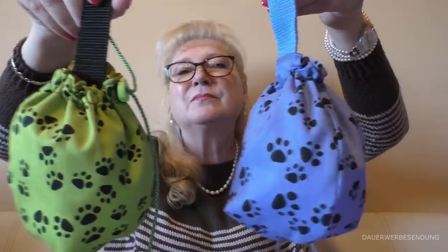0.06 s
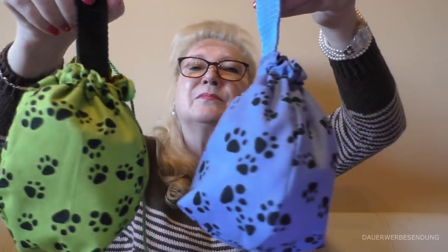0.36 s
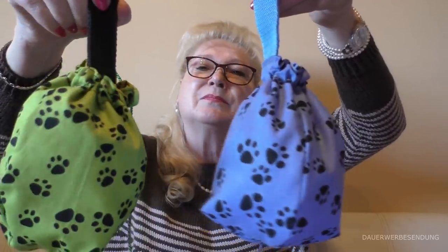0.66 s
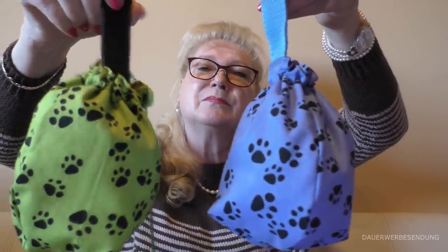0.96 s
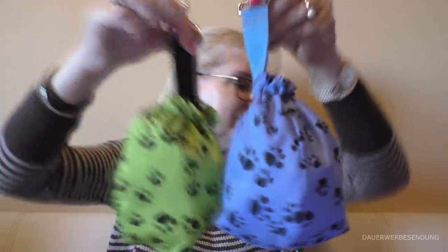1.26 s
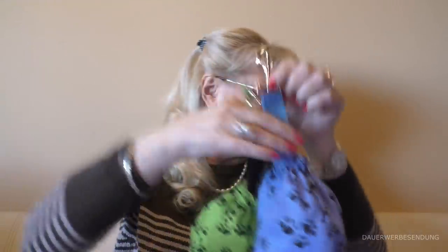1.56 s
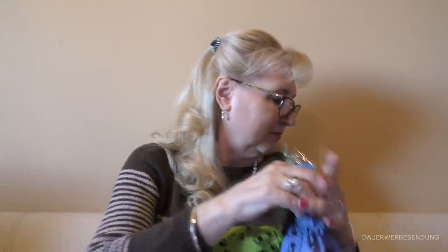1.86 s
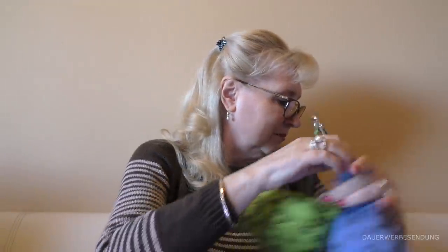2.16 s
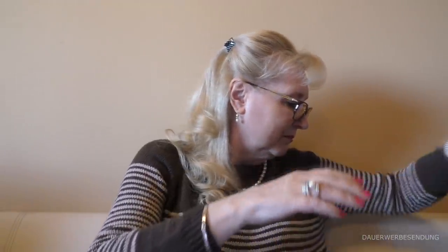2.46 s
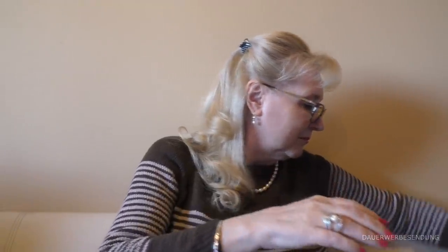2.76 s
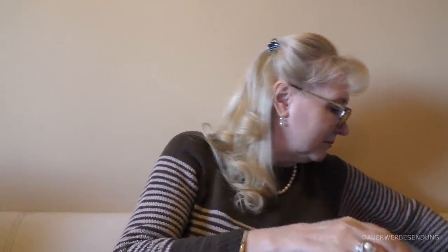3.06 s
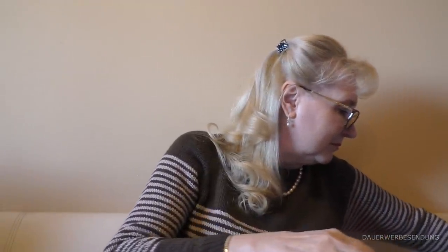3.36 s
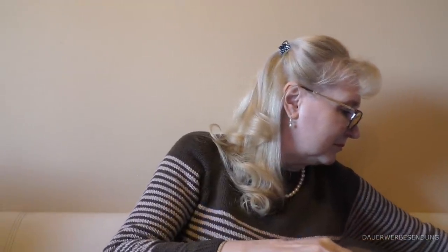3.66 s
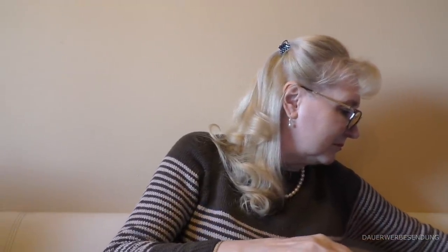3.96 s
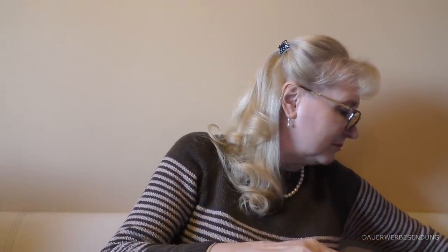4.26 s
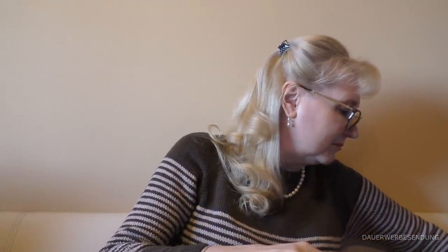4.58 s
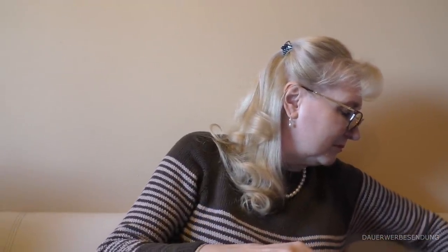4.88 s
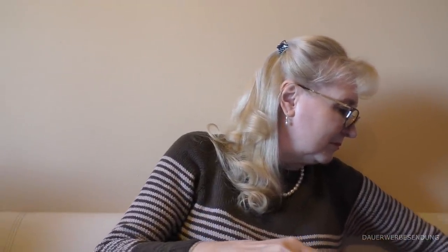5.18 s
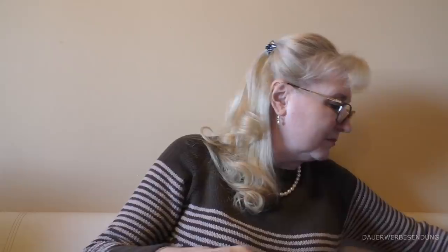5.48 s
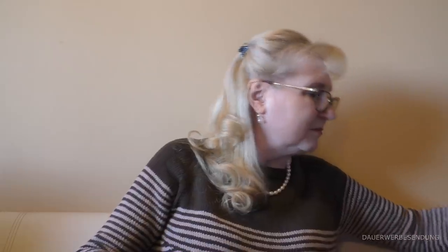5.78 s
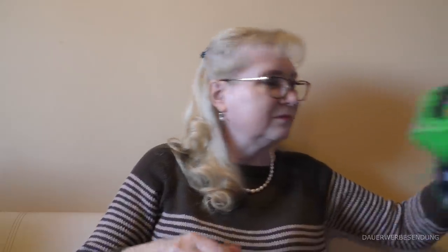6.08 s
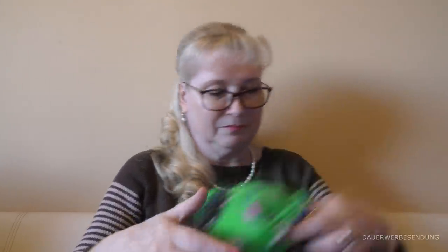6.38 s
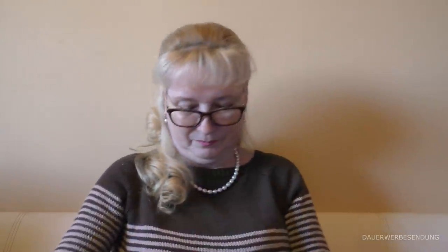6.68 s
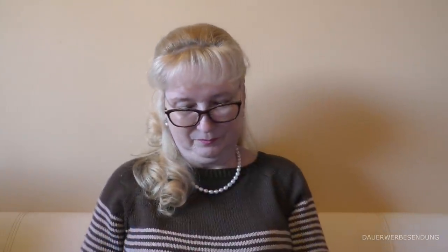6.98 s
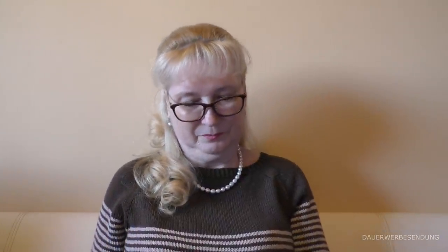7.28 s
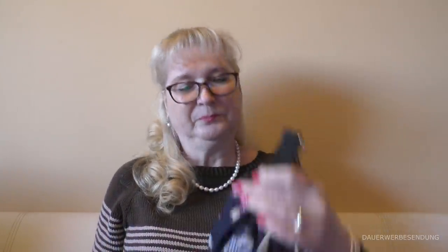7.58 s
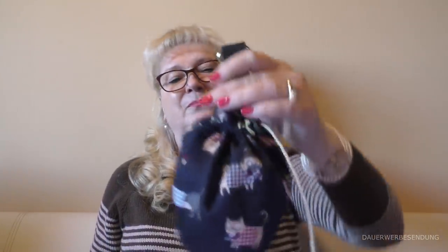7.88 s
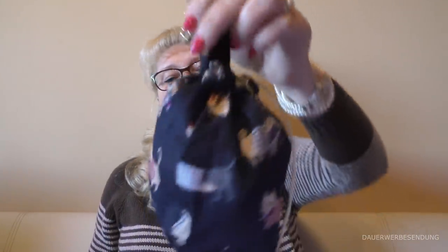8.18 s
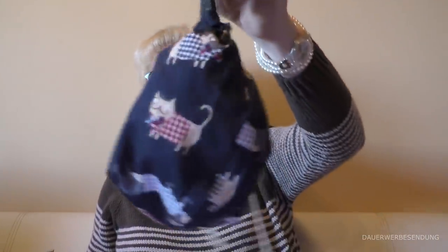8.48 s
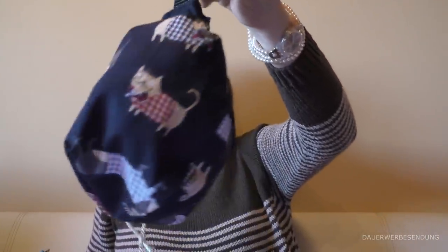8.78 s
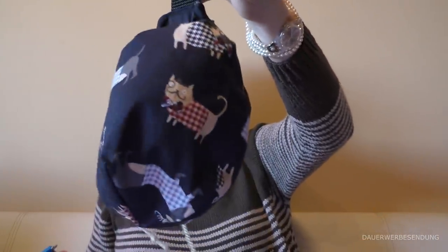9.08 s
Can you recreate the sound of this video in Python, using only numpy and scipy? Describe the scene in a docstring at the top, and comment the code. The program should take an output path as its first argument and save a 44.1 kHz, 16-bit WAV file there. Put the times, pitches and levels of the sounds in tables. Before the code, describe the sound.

Cloth bags and sleeves rustle, metal clips jingle, and filled bags land on a table with soft crunches and knocks.

```python
"""Small filled cloth bags on webbing loops are lowered onto a table and picked up in a quiet living room.
First cloth and sleeves rub and swish, and near 1.7 s a big metal ring is struck among jingling clips.
Around 3.2 s a bag lands: its filling crunches, its weight thuds and hard bits knock. Just after 5 s
a heavier landing sets the table top humming. Then come more rubbing, light bumps, clinks of clips
and jewellery, and a few last faint knocks. Everything is close to one microphone."""
import sys
import numpy as np
from scipy import signal
from scipy.fft import rfft, irfft
from scipy.io import wavfile
from scipy.ndimage import uniform_filter1d

SR = 44100
rng = np.random.default_rng(int(sys.argv[2]) if len(sys.argv) > 2 else 0)


def generate_wav(sig):
    """Save sig (samples, or channels by samples) to the path in sys.argv[1] as 16-bit PCM at SR."""
    pcm = np.round(np.clip(np.atleast_2d(sig).T, -1, 1) * 32767).astype(np.int16)
    wavfile.write(sys.argv[1], SR, pcm)


N = 411894
T = np.arange(N) / SR
AGE = T[:SR * 3 // 4]  # seconds since a short sound began

# tone of a quickly moving fold of cloth: f/Hz, level/dB
FOLD_TONE = [(80, -0.5), (300, -0.5), (650, -9), (1200, -1), (3000, -2), (6500, -9), (11000, -10),
             (17000, -26)]


def undb(db):
    """Turn decibels into a factor to multiply by."""
    return 10 ** (np.asarray(db) / 20)


def unit(x):
    """Scale a signal to an average strength (rms) of 1."""
    return x / np.std(x)


def crest(x, size=176):
    """Scale a signal so that its loudest few milliseconds have a strength of 1."""
    return x / np.sqrt(uniform_filter1d(x * x, size).max())


def add(out, start, x):
    """Mix x into out from a start time in seconds."""
    i = max(int(start * SR), 0)
    out[i:i + len(x)] += x[:N - i]


def colour(x, tone, tilt_db=0):
    """Give x the tone of a table (f/Hz, level/dB); a positive tilt, in dB per octave, brightens it."""
    octave = np.log2(np.maximum(np.fft.rfftfreq(len(x), 1 / SR), 1))
    hz, db = np.transpose(tone)
    tilt = tilt_db * (np.clip(octave, np.log2(hz[0]), np.log2(hz[-1])) - 10)
    gain = undb(np.interp(octave, np.log2(hz), db) + tilt)
    return unit(irfft(rfft(x) * gain, len(x)))


def grains(count, rate, spread_db):
    """Tiny slips of uneven size at random moments, about `rate` of them a second."""
    size = undb(spread_db * np.minimum(rng.exponential(size=count), 5))
    return unit(rng.standard_normal(count) * size * (rng.random(count) < rate / SR))


def wobble(rate):
    """A line that wanders to a new random value `rate` times a second."""
    points = rng.standard_normal(int(N / SR * rate) + 2)
    return unit(np.interp(T * rate, np.arange(len(points)), points))


def fade(t60, hold=0):
    """Stay at full strength for `hold` seconds, then die away by 60 dB every t60 seconds."""
    return np.exp(-np.log(1000) * np.maximum(AGE - hold, 0) / max(t60, 1 / SR))


def still_room():
    """The faint, steady rush of a quiet room."""
    # tone of the background: f/Hz, level/dB
    room_tone = [(15, -43), (25, -10.5), (74, -6), (151, -4.5), (204, -6.5), (254, -5), (393, -11),
                 (609, -26.5), (717, -19.5), (942, -16.5), (1810, -15), (3050, -19), (6540, -35.5),
                 (12300, -25.5), (17000, -29)]
    return undb(-61.5) * colour(rng.standard_normal(N), room_tone)


def room_echo(x):
    """A furnished room adds one near reflection and a short tail whose treble dies first."""
    noise = rng.standard_normal(len(AGE))
    low = signal.sosfilt(signal.butter(2, 3500, fs=SR, output="sos"), noise)
    tail = (low * fade(0.4) + undb(-1.5) * (noise - low) * fade(0.25)) * (AGE > .004)
    response = undb(-10.0) * tail / np.sqrt(np.sum(tail ** 2))
    response[0] = 1  # the direct sound
    response[int(.0095 * SR)] += .15  # the near reflection
    return signal.fftconvolve(x, response)[:N]


def rubbing():
    """Cloth slides in uneven pulls: many small slips, a finer hiss of fibres and creases that snap."""
    # tone of sliding cloth: f/Hz, level/dB
    cloth_tone = [(60, -23.5), (130, -3.5), (380, -3.5), (650, -14.5), (850, -13), (1250, -3.5),
                  (2000, -8.5), (3200, -13), (5000, -21.5), (9000, -40.5)]
    # tone of its fibres: f/Hz, level/dB
    fibre_tone = [(1500, -32.5), (3500, -3.5), (5500, -3), (7500, -6.5), (10000, -4), (13000, -10),
                  (17000, -16)]
    # pulls of cloth over cloth: t/s, length/s, level/dB, hiss compared with that level/dB
    pulls = [(0.975, 0.32, -74, 0.5), (1.394, 0.13, -60.5, -4.5), (1.667, 0.17, -61.5, -2.5),
             (1.922, 0.18, -60.5, -6.5), (2.147, 0.16, -60.5, 2.5), (2.44, 0.11, -68.5, -6),
             (2.72, 0.24, -56.5, -7.5), (2.977, 0.47, -61, -5.5), (3.565, 0.36, -56.5, -9),
             (4.111, 0.25, -62.5, -5.5), (4.333, 0.4, -58.5, -3), (4.776, 0.26, -57.5, -7),
             (5.305, 0.31, -56.5, -4.5), (5.652, 0.093, -60.5, -6.5), (5.81, 0.54, -68, -10.5),
             (6.345, 0.15, -61, -15), (6.513, 0.24, -56, -5.5), (6.796, .33, -60, -4.5),
             (7.16, 0.42, -60.5, -5), (7.6, 0.34, -69, -6.5), (7.902, 0.18, -63, -5),
             (8.147, 0.9, -74, -5.5)]
    rise_s, release_s, wobble_db = 0.016, 0.073, 2.18
    body, hiss = np.zeros(N), np.zeros(N)
    for start, length, db, hiss_db in pulls:
        rise = np.clip((T - start) / rise_s, 0, 1)
        release = np.exp(-np.maximum(T - start - length, 0) / release_s)
        effort = undb(db) * rise * release
        body = np.maximum(body, effort)
        hiss = np.maximum(hiss, effort * undb(hiss_db))
    slips = undb(2.5) * colour(grains(N, rate=6000, spread_db=2.0), cloth_tone)
    creases = undb(-11.5) * colour(grains(N, rate=70, spread_db=1.5), FOLD_TONE)
    fibres = undb(2.5) * colour(grains(N, rate=9000, spread_db=-1), fibre_tone)
    return (body * (slips + creases) + hiss * fibres) * undb(wobble_db * wobble(rate=35))


def swishes():
    """One fold pulled quickly over another swells up and dies away a little more slowly."""
    # flicks of cloth: t/s of the peak, level/dB, fall/s, tilt/(dB per octave)
    flicks = [(1.197, -40, 0.012, 1.5), (1.368, -48.5, 0.011, 0.5), (2.933, -52, 0.015, 0),
              (3.132, -48.5, 0.057, -0.5), (4.39, -53, .02, -1.5), (5.46, -51.5, .025, 4),
              (6.543, -48, 0.017, 15)]
    out, from_peak = np.zeros(N), AGE - AGE.mean()
    for peak, db, fall, tilt_db in flicks:
        swell = np.exp(-np.abs(from_peak / np.where(from_peak < 0, 0.81 * fall, fall)))
        rustle = colour(grains(len(AGE), rate=5900, spread_db=1.0), FOLD_TONE, tilt_db)
        add(out, peak - AGE.mean(), undb(db) * swell * rustle)
    return out


def ringing(taps, notes, tilt_db, detune):
    """Taps make metal ring at its own notes, whose pitch and level vary a little from clink to clink."""
    out, scatter_db = 0, 0.5
    for (hz, db, t60), (off_pitch, off_level) in zip(notes, rng.standard_normal((len(notes), 2))):
        # this filter answers every tap with one fading note
        pole = np.exp((2j * np.pi * hz * (1 + detune * off_pitch) - np.log(1000) / t60) / SR)
        note = crest(signal.lfilter([1], [1, -pole], taps).imag)
        gain = undb(db + tilt_db * np.log2(hz / notes[0][0]) + scatter_db * off_level)
        out = out + gain * note
    return crest(out)


def clink(rattle_s, tilt_db, links_db, ring_db=-9.5, size=8192):
    """Metal parts strike, rattle and scrape; every tap sounds the small links and the big ring."""
    # notes of the small clips and links: f/Hz, level/dB, t60/s
    link_notes = [(4730, -7, 0.066), (5260, -4, 0.044), (6470, -7, 0.061), (8900, -22, .03),
                  (8850, -5, .03), (9720, 7, 0.06), (9730, 3.5, 0.033), (9700, 0, .05),
                  (10700, -8.5, 0.056), (11180, 5, 0.059), (13300, -27.5, .03), (17050, -27.5, .04)]
    # notes of the big metal ring: f/Hz, level/dB, t60/s
    ring_notes = [(6500, 10.5, 0.061), (7670, -11.5, 0.086), (9240, 6, 0.055), (11200, 3, 0.062),
                  (11600, -8, 0.05), (11700, -10, 0.04), (17000, 1, 0.05)]
    # tone of metal scraping: f/Hz, level/dB
    scrape_tone = [(500, -38.5), (3000, -24), (5500, -9), (7500, -8.5), (9700, 0), (12500, -3),
                   (14500, -13), (16000, -11), (17000, -20.5)]
    taps = 0.47 * rng.standard_normal(size) * (rng.random(size) < 900 / SR) * (AGE[:size] < rattle_s)
    taps[0] = 1  # the first strike
    grit = colour(grains(size, rate=12000, spread_db=2.5), scrape_tone, tilt_db)
    scrape = crest(grit * fade(0.015, hold=rattle_s * 0.79)[:size])
    links = undb(links_db) * ringing(taps, link_notes, tilt_db, detune=.012)
    ring = undb(ring_db) * ringing(taps, ring_notes, tilt_db, detune=.002)
    return crest(crest(links + ring) + scrape)


def jingles():
    """Clips clink, the big ring is struck, and jewellery shakes on a moving wrist."""
    # single clinks of clips and links: t/s, level/dB, rattle/s, tilt/(dB per octave)
    clinks = [(.955, -46.5, .001, -7.5), (.987, -50.5, .008, -10.5), (1.641, -53, 0.0056, -10),
              (1.688, -38, .002, 2), (1.694, -30.5, 0.0051, 6), (1.795, -34.5, 0.011, -2),
              (2.188, -39, 0.024, 0), (2.249, -39.5, 0.0073, -4), (2.294, -40, 0.016, -6),
              (3.000, -48.5, 0.0072, -5), (3.150, -47, .025, -5), (3.262, -53, 0.033, -1),
              (3.917, -44.5, .008, 2.5), (4.117, -51, 0.024, -4), (5.028, -44, 0.0037, -7),
              (5.058, -44.5, .008, 10), (5.105, -42, 0.0037, 2), (5.899, -58, .003, 2),
              (6.118, -51, .003, -4), (6.818, -40.5, 0.0028, -4.5), (6.923, -46, 0.035, -4.5),
              (7.066, -34, .001, 0), (7.419, -50.5, .003, 4), (8.100, -35, .0045, 8), (8.145, -53, .002, 0)]
    # strikes on the big ring: t/s, level/dB, rattle/s
    strikes = [(1.740, -20.5, 0.015), (1.845, -39.5, .001)]
    # shakes of the wrist: t/s, length/s, level/dB
    shakes = [(2.044, .1, -54.5), (2.144, .21, -50.5), (2.92, .19, -55.5), (3.642, .06, -61),
              (4.289, .04, -58.5), (7.949, .11, -57)]
    clinks_per_s, scatter_db = 24, 3
    out = np.zeros(N)
    for start, db, rattle_s, tilt_db in clinks:
        add(out, start, undb(db) * clink(rattle_s, tilt_db, links_db=2))
    for start, db, rattle_s in strikes:
        add(out, start, undb(db) * clink(rattle_s, tilt_db=1, links_db=-29.5, ring_db=9.5))
    for start, length, db in shakes:
        for moment in np.arange(start, start + length, 1 / clinks_per_s):
            late = rng.random() / clinks_per_s
            strength = undb(db + scatter_db * rng.standard_normal())
            add(out, moment + late, strength * clink(rattle_s=.014, tilt_db=-4.5, links_db=-1))
    return out


def knock(db, centre_hz, t60, lead):
    """A hard hit chatters for a moment around one rough pitch; higher knocks spread more widely."""
    hz = np.maximum(np.fft.rfftfreq(len(AGE), 1 / SR), 1)
    force = rng.standard_normal(len(AGE)) * fade(t60)
    force[0] += 6  # the hit itself
    pitch_ratio = centre_hz / 1720
    width_octaves = 0.5 * pitch_ratio
    body = 1 / (1 + (np.log2(hz / centre_hz) / width_octaves) ** 4)
    click = 0.0061 * pitch_ratio ** 2  # a little of every frequency
    spectrum = rfft(np.roll(force, lead)) * (body + click)
    return undb(db) * crest(irfft(spectrum, len(AGE)))


def knocks():
    """Hard bits knock; the firmest bounce once, weaker and brighter."""
    # hits of hard bits: t/s, level/dB, centre f/Hz, t60/s
    hits = [(0.126, -47.5, 3400, 0.02), (0.355, -52, 1500, .008), (0.368, -48, 4640, 0.0047),
            (0.99, -43, 2130, .036), (1.028, -47, 3780, .017), (1.039, -44, 2150, .014),
            (1.127, -48.5, 3900, .018), (1.280, -51, 4150, 0.018), (1.978, -36.5, 1150, 0.0058),
            (2.699, -20, 1790, 0.0076), (3.241, -19, 1720, 0.0071), (3.908, -29.5, 1210, .015),
            (4.142, -45.5, 1460, 0.028), (4.195, -45.5, 1610, 0.014), (4.254, -40.5, 1090, 0.015),
            (4.621, -37, 1420, 0.017), (4.638, -34.5, 1484, 0.012), (5.049, -22, 2300, 0.039),
            (5.718, -49, 4970, 0.051), (5.959, -48.5, 4400, 0.018), (6.744, -46, 1800, .012),
            (7.993, -50, 1900, .017), (8.103, -44.5, 1900, .017), (8.385, -49, 2570, 0.032),
            (8.9, -44.5, 3130, 0.012), (8.959, -48, 2850, 0.017), (9.135, -48.5, 3140, 0.015),
            (9.146, -51.5, 2300, 0.027), (9.230, -44.5, 3100, 0.013)]
    bounce_above_db, bounce_s, bounce_db, bounce_pitch = -26, .0058, -15, 1.82
    lead = SR // 1000  # samples left free ahead of each hit for its rise
    out = np.zeros(N)
    for start, db, hz, t60 in hits:
        add(out, start - lead / SR, knock(db, hz, t60, lead))
        if db > bounce_above_db:
            add(out, start + bounce_s - lead / SR, knock(db + bounce_db, hz * bounce_pitch, t60, lead))
    return out


def table_hum():
    """The weight of a heavy landing sets the table top humming."""
    # notes of the table top: f/Hz, level/dB, t60/s
    notes = [(127.5, 4, 0.24), (125.9, -13.5, 0.97), (253, 1.5, 0.27)]
    # presses on the table top: t/s, level/dB
    presses = [(5.035, -47), (5.185, -34.5)]
    hum = sum(undb(db) * fade(t60) * np.sin(2 * np.pi * hz * AGE) for hz, db, t60 in notes)
    swell = (1 - fade(0.23)) ** 2
    out = np.zeros(N)
    for start, db in presses:
        add(out, start, undb(db) * crest(hum * swell))
    return out


def landings():
    """A bag's weight thuds and its filling crunches as it settles; a louder crunch lasts longer."""
    # bags landing or shifting: t/s, crunch level/dB, thud level/dB, settle/s, crunch tilt/(dB per octave)
    bags = [(1.972, -50, -48.5, .007, -1), (2.700, -50, -47.5, .004, -2), (2.772, -51, -45.5, 0.012, 4),
            (3.143, -36.5, -37, 0.0084, 0), (3.239, -29, -32, 0.0038, 2), (3.668, -50, -47, 0.011, 1.5),
            (3.906, -44.5, -44.5, 0.0089, -7.5), (4.618, -46, -47, .05, 1.5),
            (4.845, -47.5, -46.5, 0.0057, -5), (5.027, -42.5, -47.5, 0.014, 0.5),
            (5.048, -30.5, -51, 0.014, -1.5), (5.150, -41, -42.5, 0.029, -1.5), (5.187, -29, -36, .059, 1),
            (5.562, -45.5, -54.5, 0.047, 3.5), (6.681, -46, -47, .008, -1.5),
            (6.730, -45, -40.5, 0.0046, 0.5), (7.413, -49, -46.5, .002, -1.5)]
    # tone of the shifting filling: f/Hz, level/dB
    crunch_tone = [(60, -40), (300, -15), (750, -13.5), (1300, 3), (1900, -4.5), (2700, -6.5), (6000, -11),
                   (8000, -17.5), (10500, -16), (13000, -21.5), (17000, -33)]
    # tone of the thud: f/Hz, level/dB
    thud_tone = [(50, -40), (95, -29), (140, 2), (200, -0.5), (320, -3.5), (420, -2), (520, -8.5),
                 (700, -24), (1500, -45)]
    out = np.zeros(N)
    for start, crunch_db, thud_db, settle_s, tilt_db in bags:
        t60 = .15 * 2 ** ((crunch_db + 40) / 20.5)  # doubles with every 20.5 dB
        crunch = colour(grains(len(AGE), rate=9000, spread_db=1.25), crunch_tone, tilt_db)
        thud = colour(rng.standard_normal(len(AGE)), thud_tone)
        add(out, start, fade(t60, hold=settle_s) * (undb(crunch_db) * crunch + undb(thud_db) * thud))
    return out


def scene():
    """Balance cloth, landings, knocks and jingles, give them echo, then add table hum and background."""
    cloth = undb(0.54) * rubbing() + undb(2.0) * swishes()
    handling = cloth + undb(-1.75) * landings() + undb(-3.0) * knocks() + undb(1.1) * jingles()
    # such small things give off no deep bass
    handling = signal.sosfilt(signal.butter(3, 80, "high", fs=SR, output="sos"), handling)
    background = still_room()
    return (room_echo(handling) + table_hum() + background)[None]


def record(dry):
    """Cut away the highest treble, above 17500 Hz."""
    return signal.sosfilt(signal.ellip(10, .2, 70, 17500, fs=SR, output="sos"), dry)


dry = scene()
out = record(dry)
generate_wav(out)
```